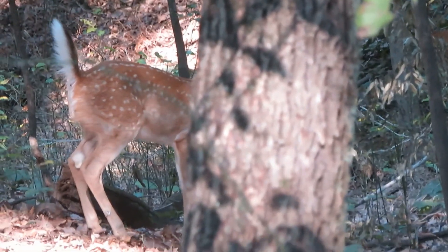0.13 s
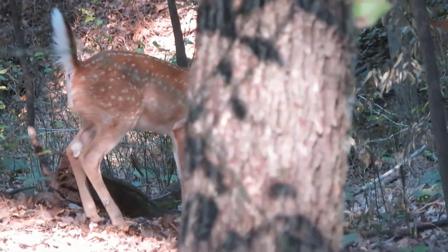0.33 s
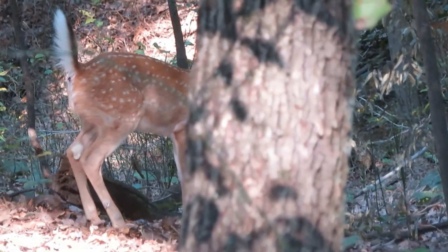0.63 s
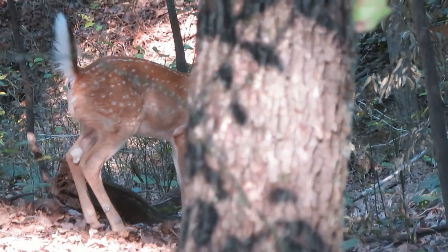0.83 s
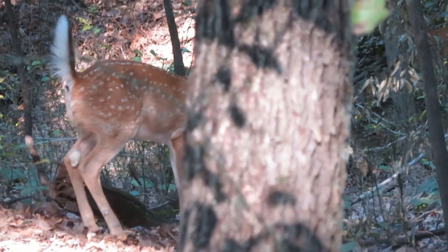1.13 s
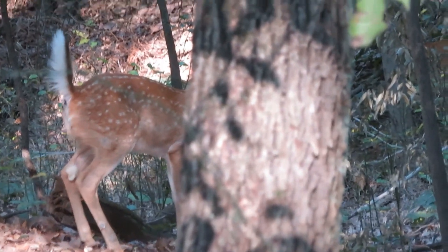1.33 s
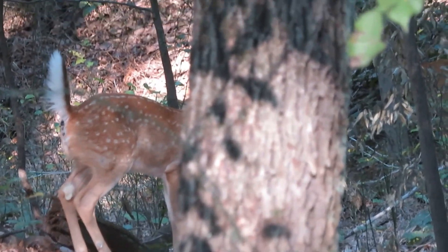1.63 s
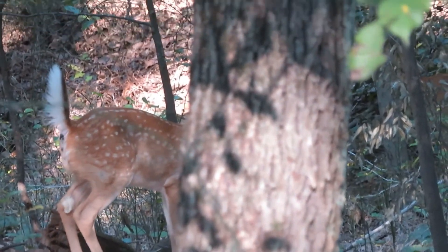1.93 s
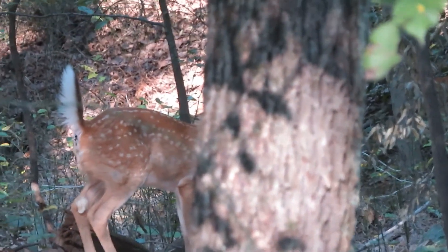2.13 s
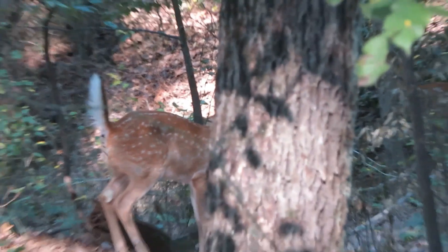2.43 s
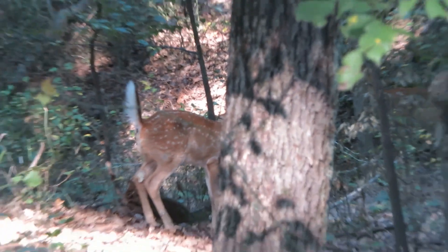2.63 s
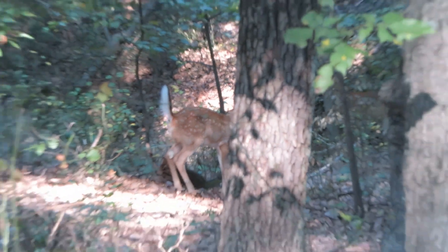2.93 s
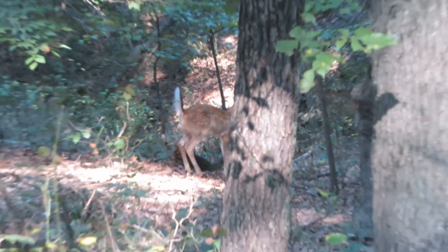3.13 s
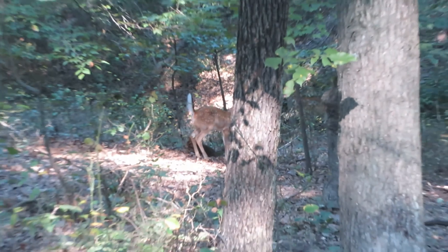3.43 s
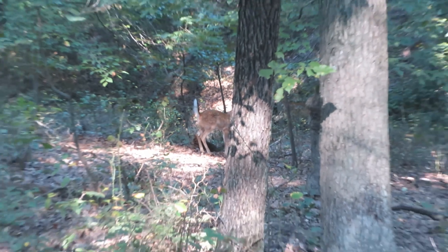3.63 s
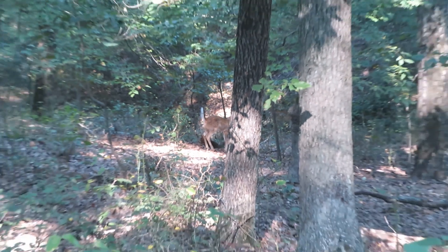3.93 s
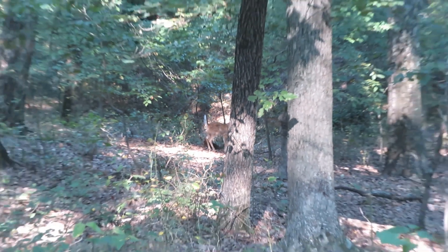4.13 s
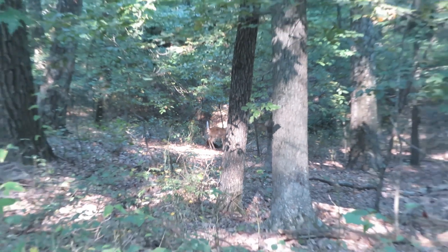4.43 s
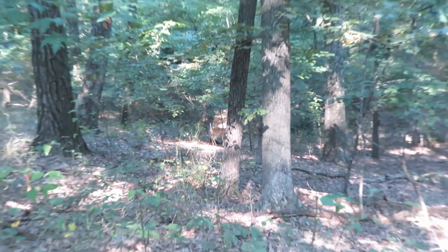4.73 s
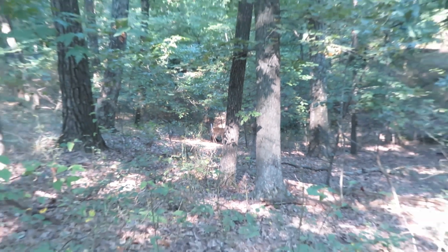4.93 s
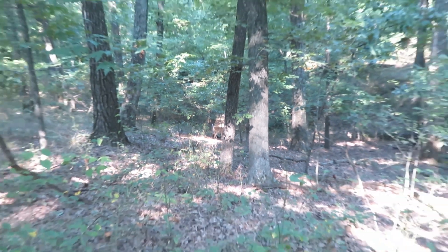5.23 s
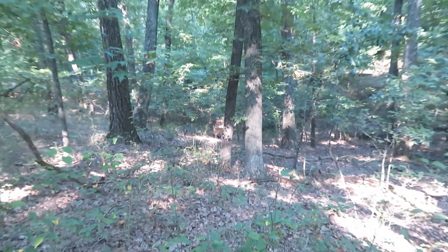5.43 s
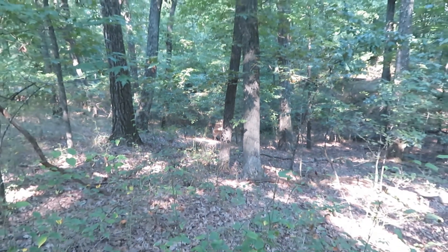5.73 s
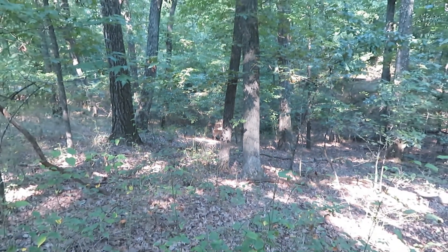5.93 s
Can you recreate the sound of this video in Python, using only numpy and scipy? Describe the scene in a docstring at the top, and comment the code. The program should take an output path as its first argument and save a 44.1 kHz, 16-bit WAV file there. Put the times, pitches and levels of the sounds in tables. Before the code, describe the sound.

A quiet summer woodland, about six seconds, heard by a small stereo microphone. From the start a deep, soft rumble of distant traffic lies under an even hiss of insects and far tyres. Low engine notes swell and fade near 0.7 and 2.4 s, while an exhaust drone wavers, settling slightly higher after 3 s. From about 1.3 s a cicada throbs softly about seven times a second, a bright, raspy buzz that grows until about 5.8 s. Between 2.3 and 5.8 s noise suppression makes the hiss grainy and watery; then it opens up again. A shimmering insect chorus rises. Thin, high cricket chirps begin around 3.2 s, roughly seven a second, clearer after 4.5 s. A far truck gradually climbs in pitch, stronger from 4.4 s, and the rumble swells near 5 s. At 6.05 s a close, hard, very short click rattles a plastic body, much louder than the rest.

```python
"""A cicada throbs about seven times a second over a chorus of insects hissing in summer woods; a cricket chirps.
Far traffic rumbles, engines swell and fade, an exhaust drones and a truck slowly gathers speed.
Filtered noise makes the insects' hiss and buzz and the traffic; scattered tones make engines and chirps.
For a spell a noise suppressor thins the hiss into grains; near the end a hard contact clicks on a plastic
body, heard as decaying resonances and a crack of noise."""
import sys
import numpy as np
from scipy import signal
from scipy.fft import rfft, irfft, next_fast_len
from scipy.io import wavfile
from scipy.ndimage import uniform_filter1d, map_coordinates

SR = 44100
rng = np.random.default_rng(int(sys.argv[2]) if len(sys.argv) > 2 else 0)


def pcm_store(signal):
    """Save signal as 16-bit PCM."""
    levels = np.round(np.clip(np.atleast_2d(signal), -1, 1) * 32767)
    wavfile.write(sys.argv[1], SR, levels.astype(np.int16).T)


N = 268921

# the spell of suppressed, differently coloured hiss: start and stop [s]
SPELL_START_S, SPELL_STOP_S = 2.313, 5.795
# left-right correlation of the spell's hiss, the chorus and the cicada: (frequency [Hz], correlation [-1 to 1])
ALIKE_SPELL = [(300, 0.74), (700, 0.17), (1600, -0.47), (2500, -0.2), (3700, 0.5), (8400, 0.57),
               (11000, -0.28), (12700, -0.2), (14000, -0.77)]


def amp(db):
    """Level to amplitude: 20 dB is a factor of ten."""
    return 10 ** (np.asarray(db) / 20)


def unit(x):
    """Normalization to an rms of 1."""
    return x / np.sqrt(np.mean(x ** 2) + 1e-20)


def clock():
    """Sampled time: the instant of every sample [s]."""
    return np.arange(N) / SR


def along(points, hz):
    """Interpolation of (frequency [Hz], value) points on a logarithmic frequency axis."""
    f, v = np.transpose(points)
    return np.interp(np.log(hz + 1), np.log(f + 1), v)


def curves(rows):
    """Linear interpolation in time: one curve for each column after the time."""
    s, *cols = np.transpose(rows)
    return [np.interp(clock(), s, c) for c in cols]


def wobble(rate):
    """Band-limited fluctuation: a smooth curve through random knots, rate of them a second."""
    knots = rng.standard_normal(int(N * rate / SR) + 4)
    steps = np.arange(len(knots) * 20) / 20
    smooth = map_coordinates(knots, [steps])
    return np.interp(clock() * rate, steps, smooth)


def filtered(x, response):
    """Linear filtering: the spectrum is multiplied by a response of frequency."""
    m = next_fast_len(N + 8192)
    hz = np.fft.rfftfreq(m, 1 / SR)
    return irfft(rfft(x, m) * response(hz), m)[..., :N]


def colour(points):
    """Spectral shaping: the response through (frequency [Hz], level [dB]) points."""
    return lambda hz: amp(along(points, hz))


def bands(rows):
    """Resonance: a sum of peaks, each (centre [Hz], width [Hz], level [dB])."""
    def response(hz):
        return sum(amp(db) / (1 + ((hz - centre) / width) ** 2 * 2) for centre, width, db in rows)
    return response


def rush(response, alike):
    """Partly coherent stereo noise of rms 1: the balance of mid and side sets the correlation."""
    def mid_side(hz):
        turn = np.arccos(np.clip(along(alike, hz), -1, 1)) / 2
        return response(hz) * np.array([np.cos(turn), np.sin(turn)])
    mid, side = filtered(rng.standard_normal((2, N)), mid_side)
    return unit(np.array([mid + side, mid - side]))


def far_tone(hz, scatter, flutter):
    """Multipath propagation: a direct wave plus wandering scattered paths, scaled to rms 1."""
    paths = 1 + scatter * (wobble(flutter) + 1j * wobble(flutter))
    phase = 2 * np.pi * np.cumsum(hz) / SR
    return unit(np.real(paths * np.exp(1j * phase)))


def speckled(x, depth_db):
    """Random modulation in time and frequency: patches of gain about 130 Hz by 25 ms."""
    z = signal.stft(x, nperseg=1024, noverlap=768)[2]
    field = rng.standard_normal(z.shape[1:])
    field = uniform_filter1d(field, size=3, axis=0)
    field = uniform_filter1d(field, size=4, axis=1)
    return signal.istft(z * amp(depth_db * unit(field)), nperseg=1024, noverlap=768)[1][:, :N]


def traffic():
    """Incoherent summation: many far engines merge into a rumble and a roar above it, both swelling slowly."""
    # spectra: (frequency [Hz], relative level per Hz [dB])
    rumble_spectrum = [(12, -19), (28, -13.5), (45, -4), (70, -0.5), (105, 0), (145, -4.5), (200, -12),
                       (400, -29.5), (800, -76)]
    roar_spectrum = [(80, -26), (150, -3.5), (210, 2.5), (290, -2), (385, -5), (420, -9.5), (455, -13),
                     (490, -15), (560, -29), (900, -37), (2000, -90)]
    # left-right correlation: (frequency [Hz], correlation [-1 to 1])
    alike_road = [(130, .9995), (280, 0.97), (500, 0.59)]
    # a heavy vehicle lifts the rumble: (loudest at [s], half length [s], lift [dB])
    heavy_pass = (4.96, 0.26, 2.3)
    # the roar ebbs, then swells with the truck: (time [s], level over its base [dB])
    roar_swell = [(0, 2.5), (1.4, -0.4), (3.4, -0.4), (4.1, 4), (5.2, 3.5), (6.1, 0.5)]
    rumble_db, roar_db = -40.5, -45.5  # base levels
    at, half, lift_db = heavy_pass
    heavy_db = lift_db * np.exp(-((clock() - at) / half) ** 2)
    swell_db, = curves(roar_swell)
    rumble_gain = amp(rumble_db + heavy_db + 0.37 * wobble(7.2))
    roar_gain = amp(roar_db + swell_db + 0.46 * wobble(9.5))
    rumble = rumble_gain * rush(colour(rumble_spectrum), alike_road)
    roar = roar_gain * rush(colour(roar_spectrum), alike_road)
    return rumble + roar


def passes():
    """Amplitude and frequency modulation: each passing engine swells and fades while its note glides."""
    # (loudest at [s], half length [s], pitch [Hz], glide [Hz per s], level [dB])
    passing_engines = [(0.66, 0.33, 159.4, -7.5, -46), (2.382, 0.37, 160.5, 15, -44)]
    fall_db = 10.5  # below the peak, half a length away
    out = np.zeros(N)
    for at, half, hz, glide, db in passing_engines:
        t = clock() - at
        gain = amp(db - fall_db * (t / half) ** 2)
        out += gain * far_tone(hz + glide * t, scatter=0.36, flutter=10)
    return out


def exhaust():
    """A drifting periodic source: an exhaust drone eases off, then settles higher; the air makes it waver."""
    # (time [s], pitch [Hz], level [dB])
    drone = [(0, 108.4, -41.5), (.25, 116.6, -38.5), (.42, 109.7, -40.5), (.67, 110, -40.5),
             (.9, 118.8, -49), (1.22, 117, -41), (1.4, 116.9, -44), (1.62, 116.9, -36),
             (1.83, 114.5, -37.5), (2.15, 112.4, -50), (2.5, 113.9, -49), (2.8, 116.4, -45.5),
             (3.2, 123.7, -44.5), (3.36, 126, -39), (3.86, 127, -38), (4.02, 126.4, -45.5),
             (4.15, 125.5, -35), (4.3, 124.3, -41), (4.95, 124.2, -37), (5.35, 125.1, -41.5),
             (6.05, 125.6, -40.5)]
    hz, db = curves(drone)
    hunting = 1.8 * wobble(9)  # random unsteadiness of pitch [Hz]
    return amp(db + .6 * wobble(9)) * far_tone(hz + hunting, scatter=.45, flutter=20)


def truck():
    """Engine tones: a truck's shaft orders, and two tones of another engine, climb together in pitch."""
    # (time [s], level [dB])
    truck_level = [(0, -59.5), (1.5, -51), (3, -55), (4.4, -43.5), (5.8, -44)]
    # the truck's orders and, at 8.375 and 12.3, the other engine: (multiple of the truck's shaft speed)
    tone_multiples = np.array([4, 6, 8.375, 9, 10, 12, 12.3, 13, 14, 15, 15.5, 16])
    # one for each tone: (relative level [dB])
    tone_levels = [-0.5, -5, 0, -4, 2, -6, 0.5, -4.5, -6.5, -3.5, -8.5, 1.5]
    shaft = 21.75 + .5 * clock()  # turns per second, steadily gaining
    truck_db, = curves(truck_level)
    tones = sum(amp(level) * far_tone(k * shaft, scatter=.27, flutter=5)
                for k, level in zip(tone_multiples, tone_levels))
    return amp(truck_db) * unit(tones)


def click():
    """Impact excitation of modes: a hard contact touches, strikes and rebounds, ringing a plastic body."""
    # a light touch, the blow, a rebound: (time [s], gain of the ring [dB], initial level of the crack [dB])
    contacts = [(6.0492, -25, -27), (6.0526, 0, -19), (6.0556, -26, -25.5)]
    # modes: (frequency [Hz], relative level [dB], decay by 60 dB [s], left-right level [dB], left lead [rad])
    body_modes = [(417, -27, 0.032, -7, -2), (727, -14, .014, -4, -1), (850, -20.5, 0.016, 7, -.1),
                  (1350, -19.5, 0.04, -4, 1.5), (1617, -8, .022, -6.5, 3.5), (2027, -14.5, 0.026, 5.5, 3.5),
                  (2565, -19, 0.032, -2, -1.6), (2650, -1.5, 0.0043, -2, -1.7), (3270, -20, 0.027, 4, -2),
                  (3600, -1.5, 0.011, -8, -1.2), (3730, -4, .011, -1, -1.5), (3880, -7.5, 0.014, 5, -1),
                  (4470, 13.5, 0.0021, -3, -3), (6200, -12, .006, 8, 3)]
    # contact noise: (frequency [Hz], relative level per Hz [dB])
    crack_spectrum = [(500, -8), (4000, -19), (5200, -12), (6400, 1), (7500, -2), (8500, 0), (10000, -8),
                      (14000, -3), (15800, -12)]
    crack_t60_s, attack_s = 0.015, .0006
    out = np.zeros((2, N))
    sides = np.array([[1], [-1]])  # each microphone port hears the modes a little differently
    for at, ring_db, crack_db in contacts:
        first = round(at * SR)
        t = np.arange(N - first) / SR
        ring = 0
        for hz, db, t60, pan, lead in body_modes:
            decay = amp(db + sides * pan / 2 - 60 * t / t60)
            ring = ring + decay * np.sin(2 * np.pi * hz * t + sides * lead / 2)
        noise = rush(colour(crack_spectrum), [(3000, 0.29)])[:, first:]
        crack = amp(crack_db - 60 * t / crack_t60_s) * noise
        attack = 1 - np.exp(-t / attack_s)
        out[:, first:] += attack * (amp(ring_db) * ring + crack)
    return out


def wash():
    """Superposed incoherent sources: far tyres and countless insects hiss, with another colour in the spell."""
    # hiss before, during and after the spell: (frequency [Hz], relative level per Hz [dB])
    before_spectrum = [(200, -27), (450, -3.5), (700, -2), (1500, -8), (2300, -8), (3400, -2.5),
                       (4200, -2.5), (6200, 0.5), (7600, -4), (9300, -13.5), (10000, -12), (11200, -20),
                       (13400, -15), (15500, -47)]
    spell_spectrum = [(200, -32), (450, -1), (700, -3.5), (1500, -7), (2500, -6.5), (3600, -3),
                      (4700, -2.5), (5400, 0.5), (6400, 1.5), (7700, -1), (9400, -15), (10000, -12.5),
                      (11000, -19.5), (13400, -18.5), (15500, -42)]
    after_spectrum = [(200, -26), (450, -3.5), (700, 0), (1500, -8.5), (3000, -9.5), (4400, 1), (6200, -4),
                      (7500, -0.5), (9000, -5.5), (10000, -12), (11000, -18), (13400, -16), (15500, -39)]
    # left-right correlation outside the spell: (frequency [Hz], correlation [-1 to 1])
    alike_outside = [(300, 0.46), (600, 0.81), (1300, 0.57), (3000, 0.91), (5000, 0.66), (8000, 0.25),
                     (10000, 0.15), (12000, -0.0047), (14000, -0.85)]
    started = np.clip((clock() - SPELL_START_S) / .01 + .5, 0, 1)
    stopped = np.clip((clock() - SPELL_STOP_S) / .015 + .5, 0, 1)
    before = unit(speckled(rush(colour(before_spectrum), alike_outside), depth_db=2.1))
    before = amp(-40.5 + 0.29 * clock()) * before
    during = amp(-39.0 + 0.045 * (clock() - SPELL_START_S)) * rush(colour(spell_spectrum), ALIKE_SPELL)
    after = amp(-38.5) * unit(speckled(rush(colour(after_spectrum), alike_outside), depth_db=2.5))
    # equal-power crossfades
    mix = np.sqrt(1 - started) * before
    mix = mix + np.sqrt(started * (1 - stopped)) * during + np.sqrt(stopped) * after
    return mix * amp(0.32 * wobble(21.12))


def chorus():
    """Independent narrow-band sources: far insects' uneven pulses overlap into a shimmer."""
    # far singers: (centre [Hz], width [Hz], relative level at the centre [dB])
    singers = [(5730, 62, -2.5), (5850, 57, -.5), (6005, 64, 2), (6190, 350, -2.5), (6540, 140, -5.5),
               (6950, 170, -5.5), (7220, 70, -5), (7454, 87, -4), (7660, 100, -3), (9200, 53, -12)]
    # (time [s], level [dB])
    chorus_level = [(0, -55.5), (2.5, -43.5), (4, -39.5), (6.1, -40)]
    shimmer_rate, shimmer_db = 22, 1.8  # each singer's pulsing: knots per second, depth
    level_db, = curves(chorus_level)
    voices = 0
    for hz, width, db in singers:
        gain = amp(db + shimmer_db * wobble(shimmer_rate)) * np.sqrt(width)
        voices = voices + gain * rush(bands([(hz, width, 0)]), ALIKE_SPELL)
    return amp(level_db) * unit(voices)


def cricket():
    """Tone bursts under multipath: chirps of uneven strength slide down and are smeared by the trees."""
    # (loudest at [s], pitch [Hz], level [dB])
    chirp_rows = [(3.238, 5220, -55), (3.33, 5160, -55), (3.469, 5240, -54), (3.615, 5205, -53),
                  (3.737, 5200, -63), (3.888, 5300, -49), (3.99, 5170, -54), (4.185, 5260, -50),
                  (4.317, 5200, -52), (4.459, 5165, -48), (4.592, 5185, -45), (4.749, 5220, -45),
                  (4.876, 5190, -48), (5.032, 5295, -44.5), (5.157, 5165, -42), (5.289, 5166, -45),
                  (5.427, 5150, -46), (5.561, 5187, -42), (5.705, 5171, -48), (5.842, 5200, -39),
                  (5.979, 5196, -44)]
    half_s, fall_db = .026, 7  # half the length of a chirp, and its fall by then
    slide_hz_per_s, waver_hz = -500, 55
    at, hz, db = np.transpose(chirp_rows)
    nearest = np.searchsorted((at[1:] + at[:-1]) / 2, clock())
    t = clock() - at[nearest]
    level_db = db[nearest] - fall_db * (t / half_s) ** 2
    pitch = hz[nearest] + slide_hz_per_s * t + waver_hz * wobble(110)
    # each side receives its own scattered paths
    return amp(level_db) * np.array([far_tone(pitch, scatter=.6, flutter=230) for side in range(2)])


def cicada():
    """Amplitude-modulated noise and resonance: tymbal throbs swell to a late peak and ring the abdomen."""
    # throbs: (start [s], level before the common 2 dB cut [dB])
    throb_rows = [(1.25, -54), (1.39, -57), (1.6, -50), (1.75, -49), (1.91, -48), (2.05, -52), (2.2, -48),
                  (2.34, -46.5), (2.49, -47.5), (2.61, -48), (2.76, -45), (2.9, -47.5), (3.04, -47.5),
                  (3.18, -47.5), (3.34, -46.5), (3.49, -46.5), (3.66, -48), (3.8, -47), (3.93, -45.5),
                  (4.04, -46), (4.18, -44.5), (4.33, -45), (4.48, -44), (4.61, -44.5), (4.76, -44),
                  (4.9, -45.5), (5.02, -44.5), (5.17, -43.5), (5.3, -43.5), (5.45, -44), (5.58, -44.5),
                  (5.73, -48), (5.86, -44), (6.01, -63)]
    # buzz: (frequency [Hz], relative level per Hz [dB])
    tymbal_spectrum = [(3000, -24), (5400, -6.5), (6100, 3.5), (7000, -1), (7650, 0.5), (8400, -3),
                       (9500, -15), (10000, -15), (11000, -23), (13200, -18), (15000, -41)]
    # lower body resonance: (centre [Hz], width [Hz], relative level [dB])
    abdomen_band = [(4430, 140, 0)]
    abdomen_db = -12.5  # below the buzz
    last_throb_s, lean, sharpness = .14, 1.45, .9  # lean delays the peak
    start, db = np.transpose(throb_rows)
    edges = np.append(start, start[-1] + last_throb_s)
    number, cycle = np.divmod(np.interp(clock(), edges, np.arange(len(edges))), 1)
    strength = amp(db[np.minimum(number.astype(int), len(db) - 1)])
    throb = np.abs(np.sin(np.pi * cycle ** lean)) ** sharpness
    rattle = amp(1.4 * wobble(180))
    buzz = speckled(rush(colour(tymbal_spectrum), ALIKE_SPELL), depth_db=2.5)
    late_stroke = throb * cycle ** 2
    ring = amp(abdomen_db) * unit(late_stroke * rush(bands(abdomen_band), ALIKE_SPELL))
    return amp(-2.0) * strength * (unit(throb * rattle * buzz) + ring)


def suppressor(x):
    """Spectral suppression: in the spell, each band is turned down when weak for that band, leaving grains."""
    # knee against the band's mean power in the spell: (frequency [Hz], level [dB])
    knee_points = [(1800, -2.5), (3600, 0), (6000, -.5), (11000, 1)]
    bass_edge_hz = 480  # the bass below is left alone
    hz, s, z = signal.stft(x, SR, nperseg=1024, noverlap=768)
    in_spell = (s > SPELL_START_S) & (s < SPELL_STOP_S)
    power = np.abs(uniform_filter1d(np.abs(z.mean(axis=0)) ** 2, size=3, axis=1))
    usual = power[:, in_spell].mean(axis=1, keepdims=True)
    knee = amp(along(knee_points, hz))[:, None] ** 2 * usual
    acting = in_spell * np.clip((hz[:, None] - bass_edge_hz) / 100 + .5, 0, 1)
    gain = (power / (power + knee + 1e-20)) ** acting
    return signal.istft(z * gain, SR, nperseg=1024, noverlap=768)[1][:, :N]


def scene():
    """Superposition: road, click and insects add linearly."""
    road = traffic() + passes() + exhaust() + truck()
    insects = wash() + chorus() + cricket() + cicada()
    return road + click() + insects


def record(dry):
    """Suppression, clipping at full scale and band limitation act in turn."""
    top_hz = 15800
    return filtered(np.clip(suppressor(dry), -1, 1), lambda hz: hz < top_hz)


dry = scene()
out = record(dry)
pcm_store(out)
```